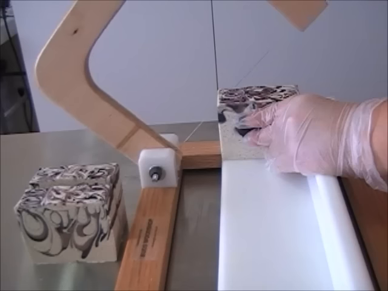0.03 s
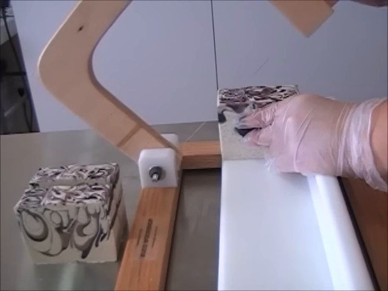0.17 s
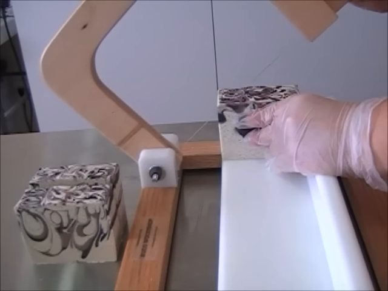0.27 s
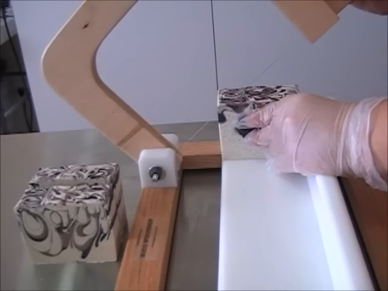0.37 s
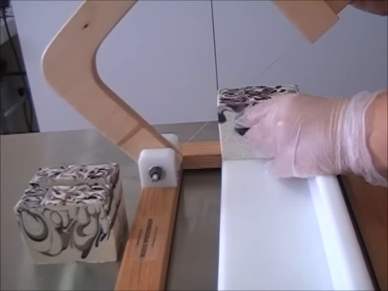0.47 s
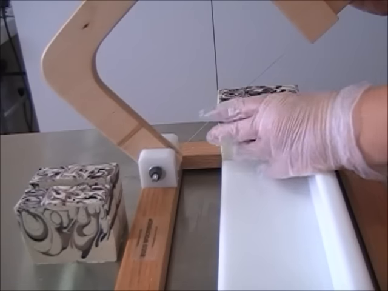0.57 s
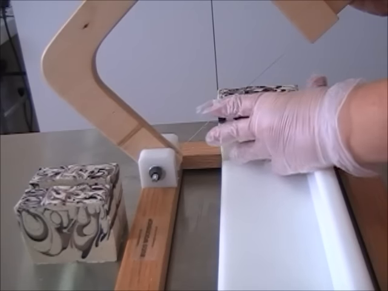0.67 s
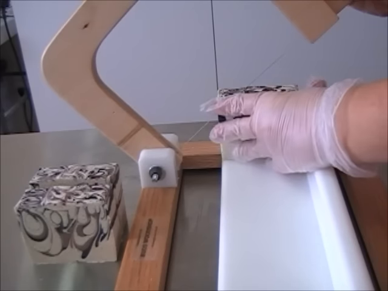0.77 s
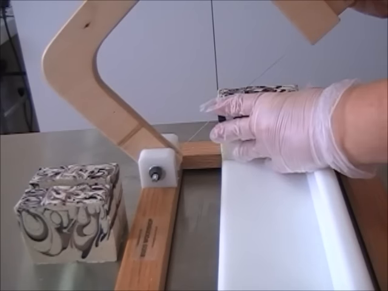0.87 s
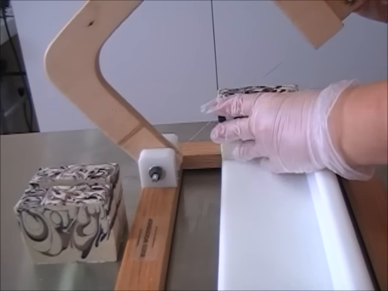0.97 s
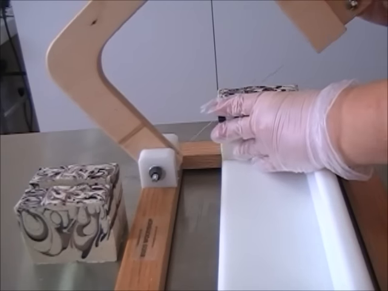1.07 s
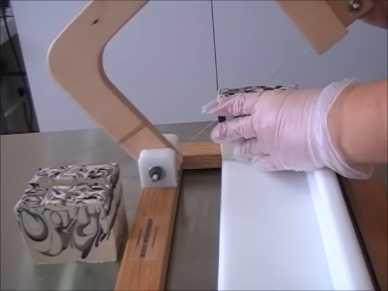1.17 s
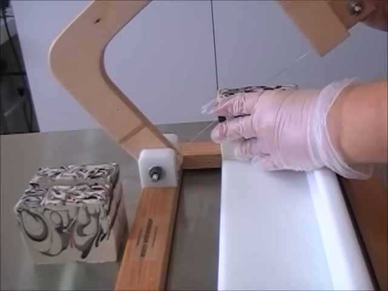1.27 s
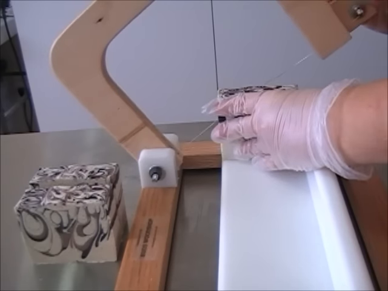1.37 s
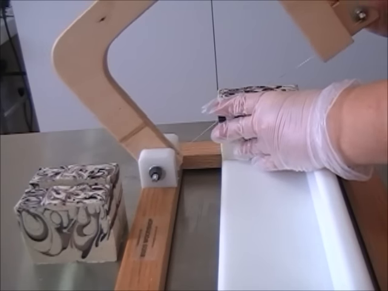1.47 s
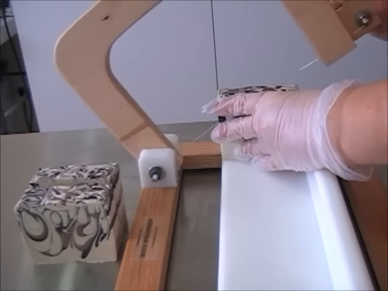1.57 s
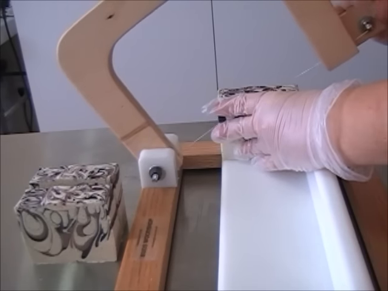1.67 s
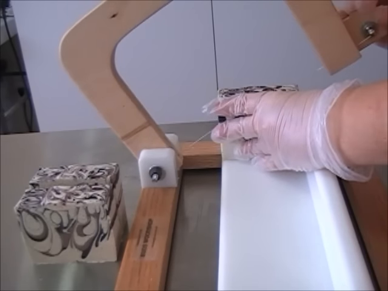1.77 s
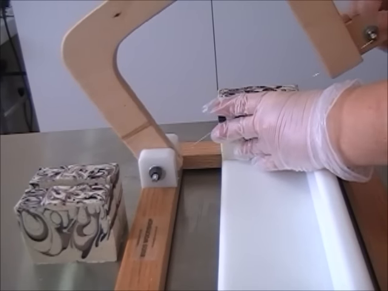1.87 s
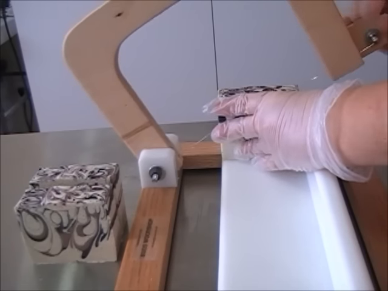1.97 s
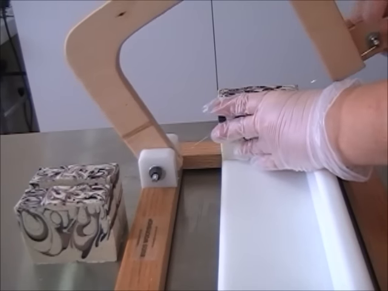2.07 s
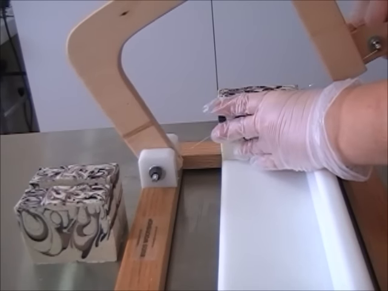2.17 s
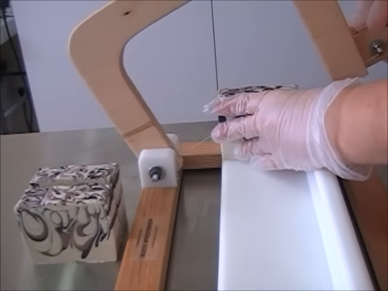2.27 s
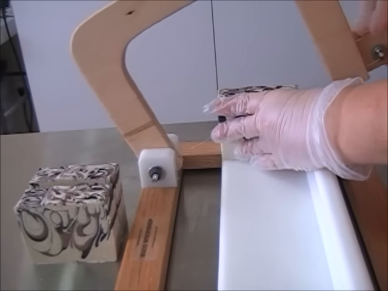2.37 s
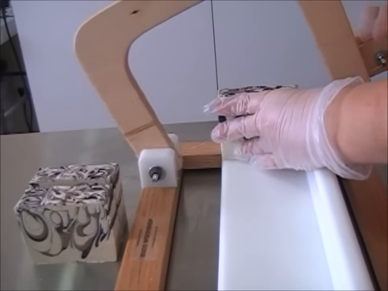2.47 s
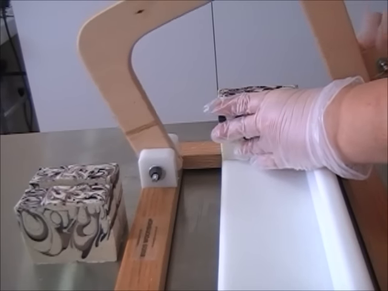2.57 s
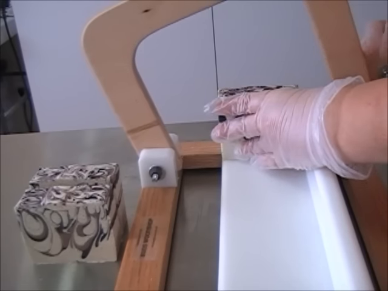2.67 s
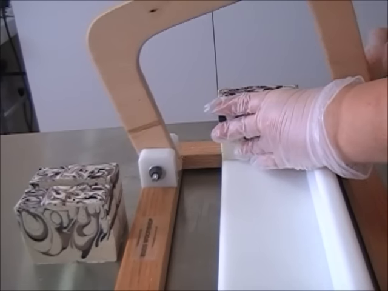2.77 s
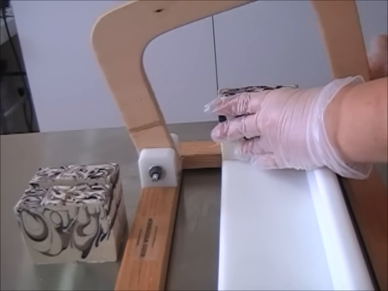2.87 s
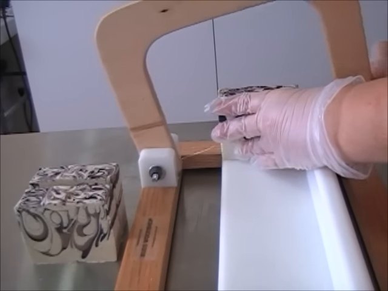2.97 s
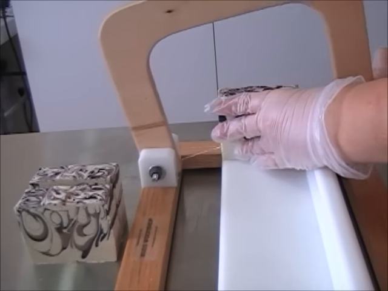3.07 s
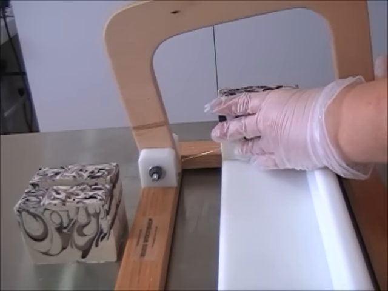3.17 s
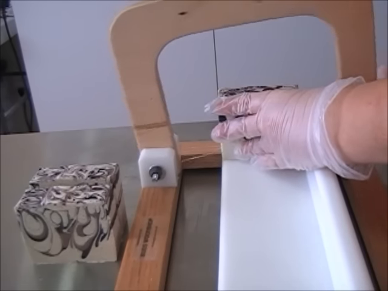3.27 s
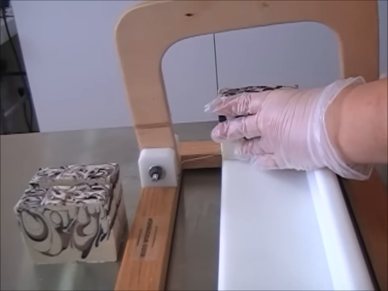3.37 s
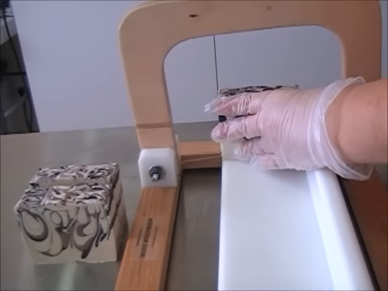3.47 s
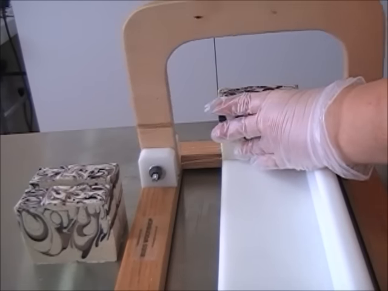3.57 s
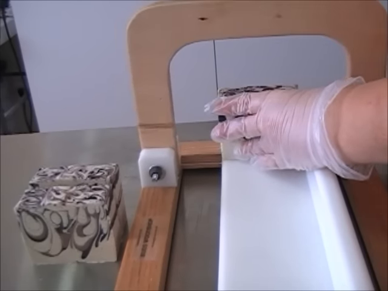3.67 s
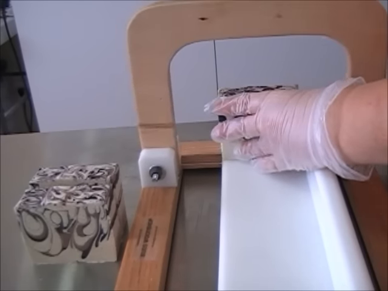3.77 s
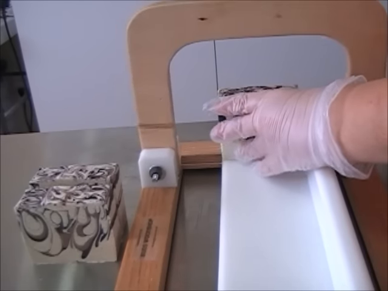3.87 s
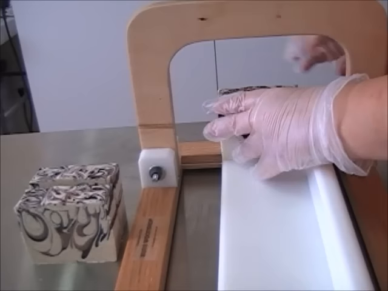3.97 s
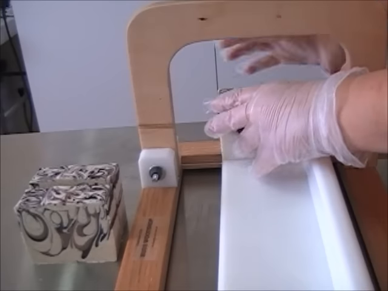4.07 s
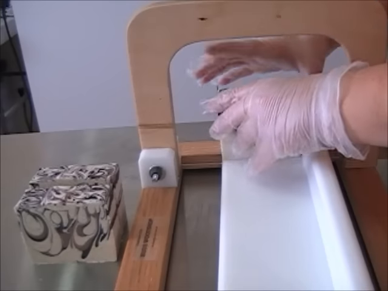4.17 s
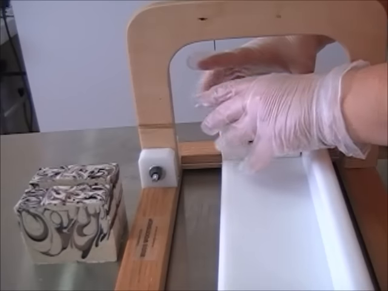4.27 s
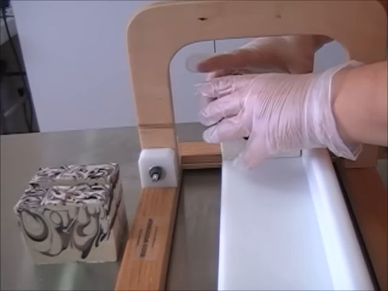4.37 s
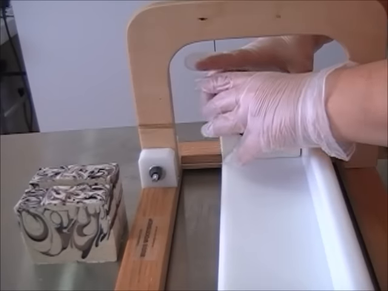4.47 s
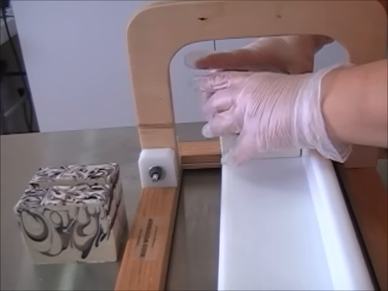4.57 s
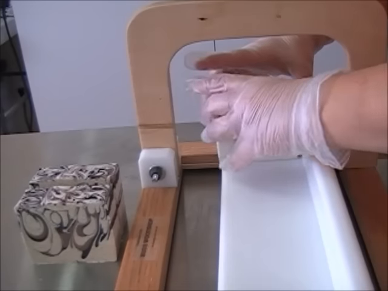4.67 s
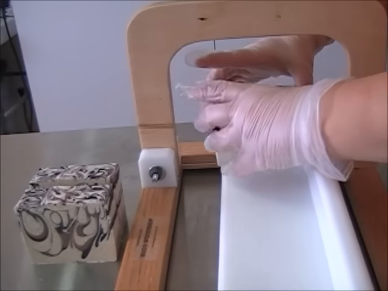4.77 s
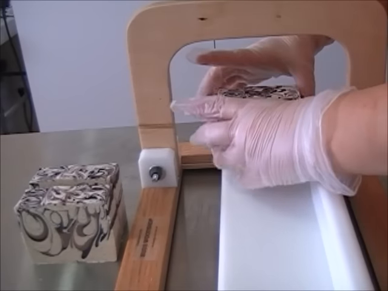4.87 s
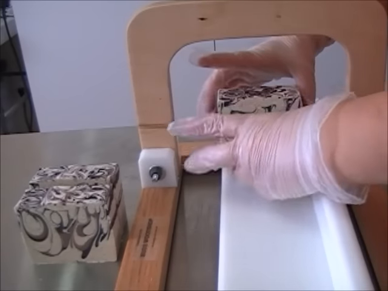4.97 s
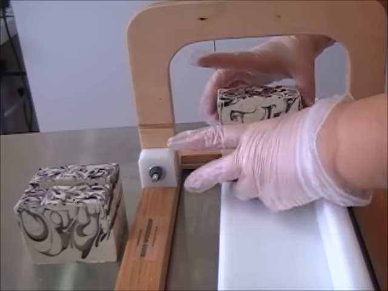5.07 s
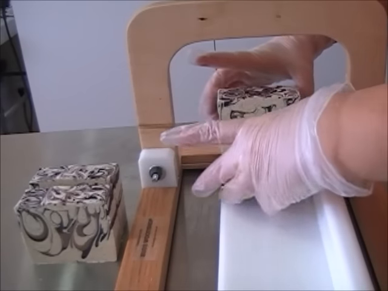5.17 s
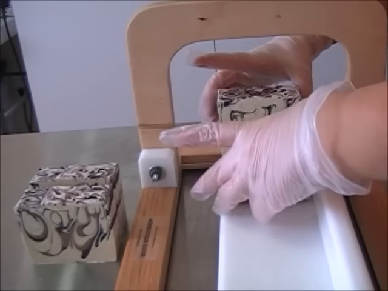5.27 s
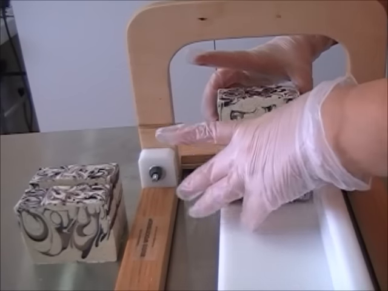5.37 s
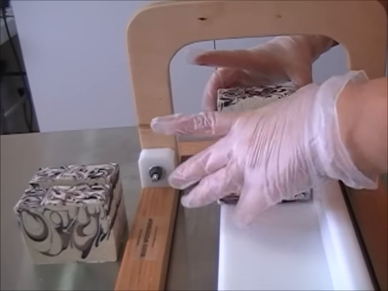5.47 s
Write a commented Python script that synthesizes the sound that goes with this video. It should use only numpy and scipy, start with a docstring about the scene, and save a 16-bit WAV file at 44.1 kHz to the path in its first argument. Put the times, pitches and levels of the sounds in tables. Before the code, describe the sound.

A quiet hard-walled workroom, heard close up in stereo, with soft air noise, a low appliance drone and a very faint high chirp pulsing nearly three times a second. Gloved hands rub a soap block around 0.4-1.1 s, with one crisp crackle near 0.5 s, then settle to barely audible friction. At 2.2 s the wire bites with a small bright click and short hiss; sparse tiny crackles continue, with a low soft table thump at 2.7 s. At about 3.6 s the wooden frame slams its base and rebounds within a few hundredths of a second: a loud, dry, slightly overloaded clack with a sharp wire snap, brief steel jangle and short room tail. From 3.8 s a faint mid-pitched wire hum slowly fades beneath a soft bump and glove rustling. Between 5.0 and 5.3 s, gentle dull knocks and scuffs on the bed mix with stronger rustles and crackles.

```python
"""Gloved hands rustle on a soap log while a hinged wooden wire cutter is pushed through it on a steel table.
The wire bites with a click and a hiss, the table thumps low, and friction crackles follow.
The wire breaks free: the frame slams on its base and rebounds, the fittings jangle, the wire snaps on the bed.
Then the wire hums on while soft knocks and more rustling come from bed and gloves, close by in a hard-walled room.
Throughout, air noise and appliance lines drone, and a faint high chirp pulses."""
import sys
import numpy as np
from scipy import signal
from scipy.fft import rfft, irfft, next_fast_len
from scipy.io import wavfile
from scipy.ndimage import map_coordinates

SR = 44100
rng = np.random.default_rng(int(sys.argv[2]) if len(sys.argv) > 2 else 0)


def file_out(sig):
    """Save sig as 16-bit WAV at sys.argv[1]."""
    # one column per channel
    cols = np.atleast_2d(sig).T
    # limit, then scale
    lim = np.clip(cols, -1, 1)
    pcm = np.round(lim * 32767).astype(np.int16)
    wavfile.write(sys.argv[1], SR, pcm)


N = 243716
WHITE = [(1000, 0)]  # flat spectrum: (frequency [Hz], relative density [dB])


def amp(db):
    """Decibels to gain."""
    return 10 ** (np.asarray(db) / 20)


def unit(x):
    """Scale to rms 1."""
    return x / np.sqrt(np.mean(x ** 2) + 1e-20)


def clock(size):
    """Seconds at each sample."""
    return np.arange(size) / SR


def fade(t, t60_s):
    """Exponential decay, 60 dB down at t60_s."""
    return np.exp(-np.log(1000) * t / t60_s)


def along(points, hz):
    """Interpolate (Hz, value) points on a log frequency axis."""
    f, value = np.transpose(points)
    return np.interp(np.log(hz + 1), np.log(f + 1), value)


def wobble(rate_hz):
    """Smooth random curve with rate_hz knots a second."""
    knots = rng.standard_normal(int(N * rate_hz / SR) + 4)
    return map_coordinates(knots, [clock(N) * rate_hz])


def filtered(x, response):
    """Multiply the spectrum of x by a response of frequency."""
    size = x.shape[-1]
    padded = next_fast_len(size + SR // 4)
    hz = np.fft.rfftfreq(padded, 1 / SR)
    return irfft(rfft(x, padded) * response(hz), padded)[..., :size]


def resonances(table, f):
    """Causal response of parallel (Hz, width Hz, dB) resonances of alternating sign."""
    total = 0
    for k, (hz, width_hz, db) in enumerate(table):
        damping = 1j * f * width_hz
        total = total + (-1) ** k * amp(db) * damping / (hz * hz - f * f + damping)
    return total


def noise(spectrum, alike, size):
    """Stereo noise of rms 1, coloured, with left-right correlation set by the mid/side balance."""
    def mid_side(hz):
        turn = np.arccos(np.clip(along(alike, hz), -1, 1)) / 2
        return amp(along(spectrum, hz)) * np.array([np.cos(turn), np.sin(turn)])
    mid, side = filtered(rng.standard_normal((2, size)), mid_side)
    return unit(np.array([mid + side, mid - side]))


def ring(modes, t, scatter_db):
    """Damped modes, struck at slightly new strengths each time."""
    total = 0
    for hz, db, t60_s in modes:
        strength = amp(db + scatter_db * rng.standard_normal())
        total = total + strength * fade(t, t60_s) * np.cos(2 * np.pi * hz * t)
    return total


def add(track, start_s, sound):
    """Mix a sound into the track at start_s."""
    start = round(start_s * SR)
    track[..., start:start + sound.shape[-1]] += sound[..., :N - start]


# frame meets base and rebounds: (time [s], ring level [dB], clatter level [dB])
FRAME_BLOWS = [(3.6147, -13, -13), (3.6187, -26.5, -18.5), (3.6336, -23.5, -18), (3.6392, -25.5, -17.5)]
# frame and base modes, room linger included: (frequency [Hz], relative level [dB], t60 [s])
FRAME_MODES = [(116.5, -19.5, .3), (144.5, -13, 0.37), (185, -17, 0.18), (206, -9, 0.064),
               (269.7, -18, .32), (299.5, -10.5, .3), (332, -5, .045), (543.3, -22, 0.36), (614, -22, 0.36),
               (771, -16, .3), (799, -9.5, .33), (839, -4, .06), (1050, -14, 0.29), (1260, -21, 0.36),
               (1483, -20.5, .3), (1614, -20, .3), (1743, -22, .33), (1895, -22.5, .35), (2905, -24, 0.44),
               (3270, -22, 0.33), (3430, -21, 0.23)]
# dense short-lived wood modes: (frequency [Hz], relative density [dB])
CLATTER_SPECTRUM = [(30, -47.5), (80, -19), (150, -2.5), (320, -0.5), (520, -3.5), (800, 2), (940, -15),
                    (1200, -13), (1700, -9.5), (2200, -18.5), (3300, -11.5), (4500, -18), (7500, -20),
                    (10000, -27), (15000, -42)]
# stereo image of the cutter's noises: (frequency [Hz], left-right correlation [-1..1])
CUTTER_ALIKE = [(200, 0.94), (1400, .92), (3500, 1), (7000, 0.77), (15000, .4)]


def frame(clatter_t60_s=0.048, contact_s=.0013):
    """Each blow rings the frame's main modes over a short wooden clatter; returns ring and clatter."""
    tone, clatter, t = np.zeros(N), np.zeros((2, N)), clock(SR // 2)
    press = 1 - np.exp(-t / contact_s)
    for time_s, ring_db, clatter_db in FRAME_BLOWS:
        add(tone, time_s, amp(ring_db) * press * ring(FRAME_MODES, t, scatter_db=1))
        wood = noise(CLATTER_SPECTRUM, CUTTER_ALIKE, len(t))
        add(clatter, time_s, amp(clatter_db) * press * fade(t, clatter_t60_s) * wood)
    return tone, clatter


# steel tuning peg rattles: (time [s], level [dB])
PEG_RATTLES = [(3.6155, -27), (3.6182, -16.5), (3.6212, -19.5), (3.6286, -19.5)]
# peg resonances: (frequency [Hz], width [Hz], relative level [dB])
PEG_MODES = [(7030, 250, -5), (7680, 130, 3.5), (8670, 220, -7.5), (9550, 120, -11)]


def peg(t60_s=.03):
    """The jolt sets the steel fitting chattering: decaying bursts of noise through its resonances."""
    out, t = np.zeros((2, N)), clock(SR // 8)
    for time_s, db in PEG_RATTLES:
        steel = unit(filtered(noise(WHITE, CUTTER_ALIKE, len(t)), lambda f: resonances(PEG_MODES, f)))
        add(out, time_s, amp(db) * fade(t, t60_s) * steel)
    return out


# wire striking the bed: (frequency [Hz], width [Hz], relative level [dB])
SNAP_MODES = [(1072.3, 140, -1.5), (1600, 500, -7), (3290, 360, 1), (4100, 350, -12), (4830, 340, -11.5),
              (5630, 950, -11.5), (7900, 2200, -21.5), (12500, 3000, -34.5)]


def snap(crack_s=3.631, peak_db=3, sweep_s=.0034, buzz_s=3.6318, buzz_db=-6, buzz_t60_s=0.016):
    """The stiff wire slaps the bed: high bending waves arrive first, so the crack sweeps down; a buzz follows."""
    out, t = np.zeros((2, N)), clock(SR // 8)

    def dispersed(f):
        phase = 4 * np.pi * sweep_s * np.sqrt(SNAP_MODES[0][0] * f)  # travel time goes as 1 / sqrt(frequency)
        return resonances(SNAP_MODES, f) * np.exp(-1j * phase)
    crack = filtered(signal.unit_impulse(len(t)), dispersed)
    add(out, crack_s, amp(peak_db) * crack / np.abs(crack).max())
    buzz = unit(filtered(noise(WHITE, CUTTER_ALIKE, len(t)), lambda f: resonances(SNAP_MODES, f)))
    add(out, buzz_s, amp(buzz_db) * fade(t, buzz_t60_s) * buzz)
    return out


# taut wire partials: (frequency [Hz], relative level [dB], t60 [s])
WIRE_PARTIALS = [(421, -55.5, 4.84), (842, -62.5, 2.9), (1270, -72, 2.1), (2541, -81, 2.26)]


def wire(start_s=3.825, gain_db=-1, beat_hz=2.6, beat_share=0.4, beat_lag_s=0.15, rise_s=0.012):
    """Lifted clear of the bed the wire sings; its two planes of vibration beat slowly."""
    out, t = np.zeros(N), clock(2 * SR)
    rise = 1 - np.exp(-t / rise_s)
    for hz, db, t60_s in WIRE_PARTIALS:
        plane = np.sin(2 * np.pi * hz * t)
        other = beat_share * np.sin(2 * np.pi * (hz * t + beat_hz * (t - beat_lag_s)))
        add(out, start_s, amp(db + gain_db) * fade(t, t60_s) * rise * (plane + other))
    return out


def bite(start_s=2.176, click_db=-36.5, click_hz=8000, hiss_db=-67, hiss_t60_s=.3):
    """The wire bites into the log: a bright click and a short hiss."""
    out, t = np.zeros((2, N)), clock(SR // 3)
    add(out, start_s, amp(click_db) * crackle(click_hz, tail_db=-24))
    hiss = fade(t, hiss_t60_s) * noise(RUB_SPECTRUM, HANDS_ALIKE, len(t))
    add(out, start_s, amp(hiss_db) * hiss)
    return out


def table_thump(start_s=2.7195, db=-40.0, contact_s=0.0018):
    """Leaning on the frame makes the table give one low thump of two damped modes."""
    out, t = np.zeros(N), clock(SR // 3)
    modes = [(101, -2.5, 0.2), (135, -6, .04)]  # (frequency [Hz], relative level [dB], t60 [s])
    body = sum(amp(level) * fade(t, t60_s) * np.sin(2 * np.pi * hz * t) for hz, level, t60_s in modes)
    add(out, start_s, -amp(db) * (1 - np.exp(-t / contact_s)) * body)
    return out


# frame, soap and hands bump the bed: (time [s], thud level [dB], scuff level [dB], scuff brightness [Hz])
BED_KNOCKS = [(3.832, -48, -57, 500), (4.983, -45.5, -42, 1790), (5.066, -54, -48.5, 1900),
              (5.269, -41.5, -43.5, 2600), (5.291, -47, -55, 1200)]
# bed modes: (frequency [Hz], relative level [dB], t60 [s])
BED_MODES = [(69.6, -5, 0.22), (113, -8, .15), (157.8, -4.5, 0.24), (217, -2.5, 0.1), (273, 0.5, 0.064),
             (311, -8, 0.084), (485, -13, 0.034), (1086, -4, 0.067), (1326, -3, 0.07)]
# soap on plastic: (frequency [Hz], relative density [dB])
SCUFF_SPECTRUM = [(40, -28), (200, -4), (480, 3.5), (650, -2.5), (950, -6), (1300, -0.5), (1900, -6),
                  (2800, -21), (8000, -13.5)]


def knocks(scuff_t60_s=0.067, contact_s=0.0021, settle_s=0.00407, thud_hz=600):
    """Soft bumps on the bed: a scuff, then a low thud as the weight lands; softer contacts are duller."""
    out, t = np.zeros((2, N)), clock(SR // 3)

    def soften(x, hz):
        return filtered(x, lambda f: 1 / (1 + 1j * f / hz - (f / hz) ** 2))
    for time_s, thud_db, scuff_db, bright_hz in BED_KNOCKS:
        scuff = amp(scuff_db) * fade(t, scuff_t60_s) * noise(SCUFF_SPECTRUM, CUTTER_ALIKE, len(t))
        thud = amp(thud_db) * (1 - np.exp(-t / contact_s)) * ring(BED_MODES, t, scatter_db=4.5)
        add(out, time_s, soften(scuff, bright_hz))
        add(out, time_s + settle_s, soften(thud, thud_hz))
    return out


# crackle burst colour: (frequency [Hz], relative density [dB])
CRACKLE_SPECTRUM = [(500, -5.5), (2500, -0.5), (7500, -1), (10000, -5), (15000, -18.5)]
# stereo image of the hands: (frequency [Hz], left-right correlation [-1..1])
HANDS_ALIKE = [(500, .9), (5000, 0.97), (8000, .88), (13000, 0.88)]


def crackle(hz, tail_db, t60_s=.006, attack_s=.0005, width=0.55, peak_db=2, tail_t60_s=0.079):
    """One crackle: a tiny burst and a faint rustle after it, through one broad resonance."""
    t = clock(SR // 8)
    decay = fade(t, t60_s) + amp(tail_db) * fade(t, tail_t60_s)
    burst = (1 - np.exp(-t / attack_s)) * decay * noise(CRACKLE_SPECTRUM, HANDS_ALIKE, len(t))
    tick = filtered(burst, lambda f: resonances([(hz, width * hz, 0)], f))
    return amp(peak_db) * tick / np.abs(tick).max()


# sharp crackles of glove and soap: (time [s], gain on a crackle [dB], pitch [Hz])
GLOVE_TICKS = [(.4415, -47, 7100), (.5112, -30.5, 4930), (.5275, -44, 6800), (.6748, -48, 5100),
               (.7528, -48.5, 8700), (.9732, -46, 3370), (3.0495, -49.5, 2660), (4.049, -45.5, 5360),
               (4.1055, -41.5, 7050), (4.1548, -44.5, 6350), (4.186, -43.5, 6710), (5.041, -37.5, 5040),
               (5.2692, -36.5, 4550), (5.3305, -37.5, 7140)]


def ticks():
    """The glove sticks to the soap and lets go with a sharp crackle."""
    out = np.zeros((2, N))
    for time_s, db, hz in GLOVE_TICKS:
        add(out, time_s, amp(db) * crackle(hz, tail_db=-26))
    return out


# hands press on the log, or the wire works through it:
# (start [s], end [s], friction level [dB], crackle rate [1/s], gain on a crackle [dB])
LOG_PRESSES = [(0.719, 1.05, -80, 12, -55.5), (2.349, 3.351, -80, 9, -57.5), (3.851, 4.75, -72, 7, -55.5)]


def crackling(typical_hz=5200, spread_octaves=.4, scatter_db=1.5):
    """Under pressure, glove and soap give faint crackles at uneven intervals."""
    out = np.zeros((2, N))
    for start_s, end_s, _, rate_hz, db in LOG_PRESSES:
        draws = rng.standard_normal((int((end_s - start_s) * rate_hz), 3))
        for k, (shift, size, pitch) in enumerate(draws):
            time_s = start_s + (k + (1 + np.tanh(shift)) / 2) / rate_hz
            hz = typical_hz * 2 ** (spread_octaves * pitch)
            add(out, time_s, amp(db + scatter_db * size) * crackle(hz, tail_db=-26))
    return out


# gloved hand slides over the soap: (time of greatest speed [s], level [dB], rise [s], release [s])
HAND_STROKES = [(.512, -51.5, 0.088, .11), (.655, -58, 0.28, .13), (.99, -69, 0.13, 0.23),
                (1.1, -64, 0.086, .08), (1.55, -71.5, 0.046, .08), (4.06, -62.5, 0.21, 0.24),
                (4.21, -62.5, .05, .4), (4.485, -57.5, 0.042, 0.075), (4.85, -60.5, 0.066, .22),
                (5.125, -56.5, 0.29, .3), (5.27, -55, 0.11, .06), (5.329, -53, .08, 0.1)]


def sliding(fall_db=20, ramp_s=.1):
    """Friction strength: strokes swell and die away by fall_db, presses hold steady; their powers sum."""
    t, parts = clock(N), []
    for peak_s, db, rise_s, release_s in HAND_STROKES:
        distance = np.maximum((peak_s - t) / rise_s, (t - peak_s) / release_s)
        parts.append(amp(db - fall_db * distance))
    for start_s, end_s, db, _, _ in LOG_PRESSES:
        parts.append(amp(db) * np.clip(np.minimum(t - start_s, end_s - t) / ramp_s, 0, 1))
    return np.linalg.norm(parts, axis=0)


# glove on soap: (frequency [Hz], relative density [dB])
RUB_SPECTRUM = [(500, -12), (1000, -5.5), (1700, -8.5), (3300, -1.5), (5000, -1.5), (7300, 0.5), (9000, -6),
                (11500, -17.5), (15500, -27.5)]


def rubbing(grain_db=3.5, grain_hz=1100, clump_db=1.64, clump_hz=90):
    """Glove and soap slide in countless tiny slips, which come in clumps."""
    slips = amp(grain_db * wobble(grain_hz) + clump_db * wobble(clump_hz))
    return sliding() * unit(slips * noise(RUB_SPECTRUM, HANDS_ALIKE, N))


# reverberation: (frequency [Hz], t60 [s])
ROOM_T60 = [(80, 0.99), (210, .36), (560, .52), (1470, .58), (3880, 0.57), (8000, 0.49), (14000, .25)]
# reverberation colour: (frequency [Hz], relative density [dB])
ROOM_SPECTRUM = [(60, -2.5), (150, -1), (400, 0.5), (780, 3), (930, -2.5), (1300, 2.5), (2300, 4),
                 (3400, -6), (4400, 2), (5300, -2.5), (6500, 0), (7700, -5), (10500, -9), (14000, -15.5)]
# reverberation stereo image: (frequency [Hz], left-right correlation [-1..1])
ROOM_LIKENESS = [(150, 0.99), (600, .92), (1700, .88), (4500, 0.48), (8000, 0.39), (14000, .35)]


def room(x, wet_db=-14.5, build_s=0.0028):
    """Hard walls answer after a few milliseconds; each frequency dies at its own speed."""
    hz, t, bands = signal.stft(noise(ROOM_SPECTRUM, ROOM_LIKENESS, SR), SR, nperseg=256)
    decay = fade(t, along(ROOM_T60, hz)[:, None])
    tail = signal.istft(bands * decay, SR, nperseg=256)[1]
    tail = tail * (1 - np.exp(-(clock(tail.shape[1]) / build_s) ** 2))
    mono = x.mean(0)[None]
    return amp(wet_db) * signal.fftconvolve(mono, tail / np.linalg.norm(tail[0]), axes=1)[:, :N]


# steady rush of the room: (frequency [Hz], relative density [dB])
AIR_SPECTRUM = [(12, -63), (20, -34), (49, -7), (87, -10.5), (112, -8), (185, -7), (534, -11.5),
                (667, -16.5), (1070, -15.5), (1270, -20.5), (3850, -32), (4550, -30.5), (4950, -36),
                (6360, -33), (15500, -48)]
# stereo image of the rush: (frequency [Hz], left-right correlation [-1..1])
AIR_LIKENESS = [(60, -0.53), (180, -0.18), (550, -0.52), (1650, -0.25), (4970, 0.0033), (15000, 0.084)]
# appliance lines: (frequency [Hz], rms level [dB])
DRONE_LINES = [(120, -70), (721, -84), (1081.5, -73.5), (2163, -91)]


def background(air_db=-60.0, waver_db=1.0, drift_rad=.35):
    """Steady air noise with the appliance's lines, slightly unsteady in level and phase."""
    lines = np.zeros(N)
    for hz, db in DRONE_LINES:
        level = amp(db + waver_db * wobble(3.7)) * np.sqrt(2)
        lines += level * np.sin(2 * np.pi * hz * clock(N) + drift_rad * wobble(5))
    return amp(air_db) * noise(AIR_SPECTRUM, AIR_LIKENESS, N) + lines


def chirp(db=-78, hz=4500, width_hz=130, period_s=.366, centre_s=.25):
    """Faint narrow-band noise, gated on and off nearly three times a second, like a distant cricket."""
    cycle = np.cos(2 * np.pi * (clock(N) - centre_s) / period_s)
    narrow = filtered(noise(WHITE, AIR_LIKENESS, N), lambda f: resonances([(hz, width_hz, 0)], f) ** 2)
    return amp(db) * np.clip(2 * cycle + 1, 0, 1) * unit(narrow)


# direction of the cutter: (frequency [Hz], left minus right [dB])
CUTTER_LEAN = [(110, -1.5), (400, -1.5), (1200, -3.5), (2400, -1.5), (4400, .5), (12000, 1.4)]


def scene(bass_hz=75):
    """The cutter, a little to the right, and the hands, in their room, over the background."""
    tone, clatter = frame()
    near = clatter + peg() + snap() + knocks() + ticks() + bite() + rubbing() + crackling()

    def bass_cut(hz):  # deep bass below bass_hz is held back
        return -hz ** 2 / (bass_hz ** 2 - hz ** 2 + 1j * hz * bass_hz)
    sound = filtered(near + room(near) + tone, bass_cut)  # tone's decays already include the room
    sound = sound + wire() + table_thump()
    placed = filtered(sound, lambda hz: amp(np.outer([.5, -.5], along(CUTTER_LEAN, hz))))
    return placed + background() + chirp()


def record(dry, ceiling=0.51, top_hz=15800):
    """The microphone overloads smoothly at its ceiling; nothing above top_hz is kept."""
    clipped = dry / (1 + np.abs(dry / ceiling) ** 6) ** (1 / 6)
    return filtered(clipped, lambda hz: hz < top_hz)


dry = scene()
out = record(dry)
file_out(out)
```